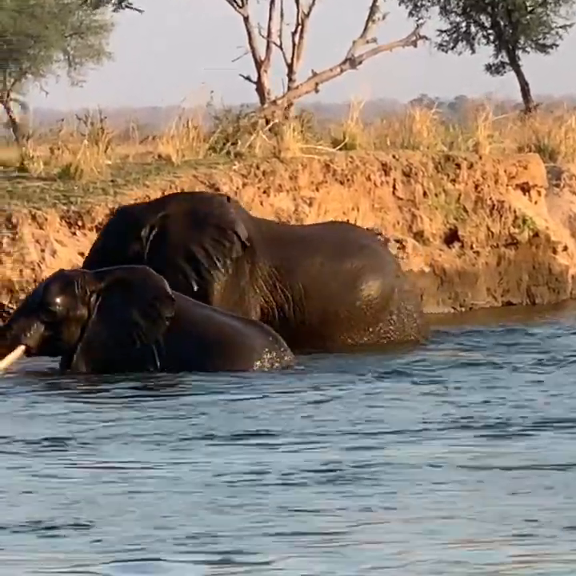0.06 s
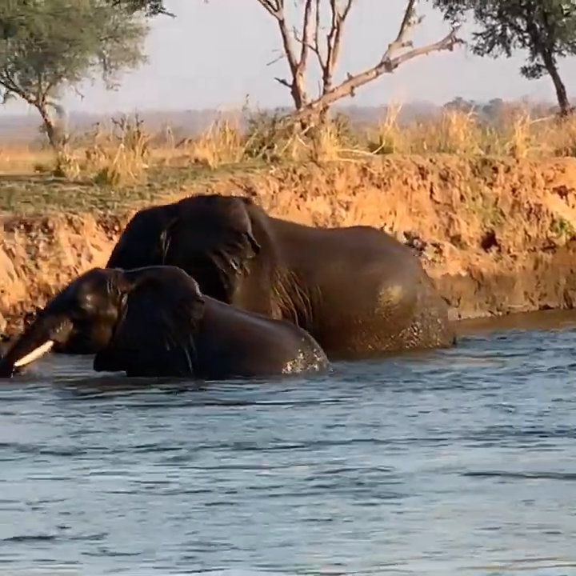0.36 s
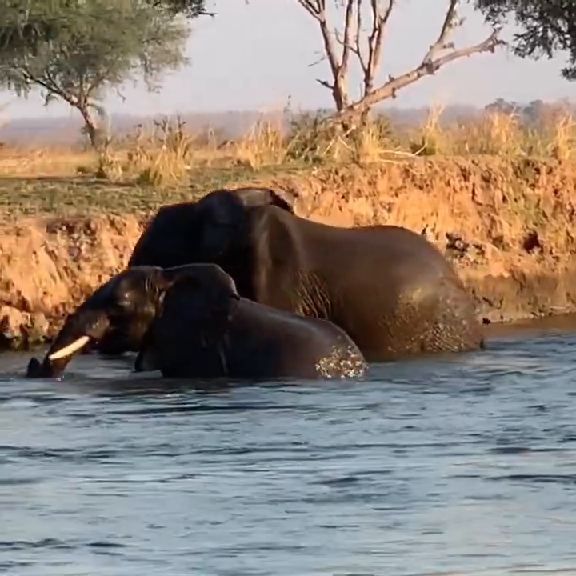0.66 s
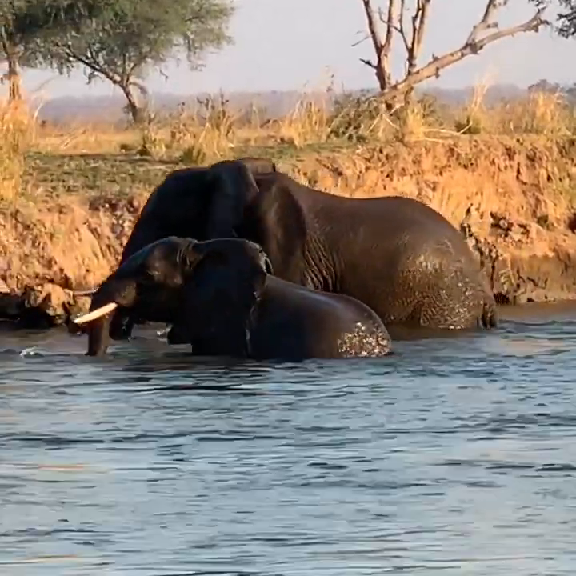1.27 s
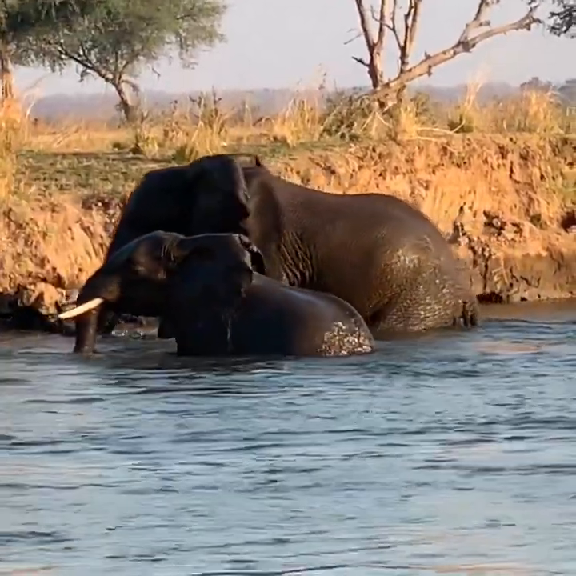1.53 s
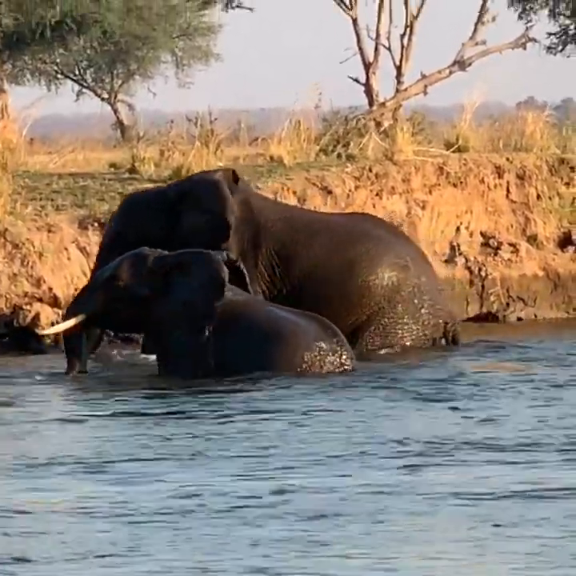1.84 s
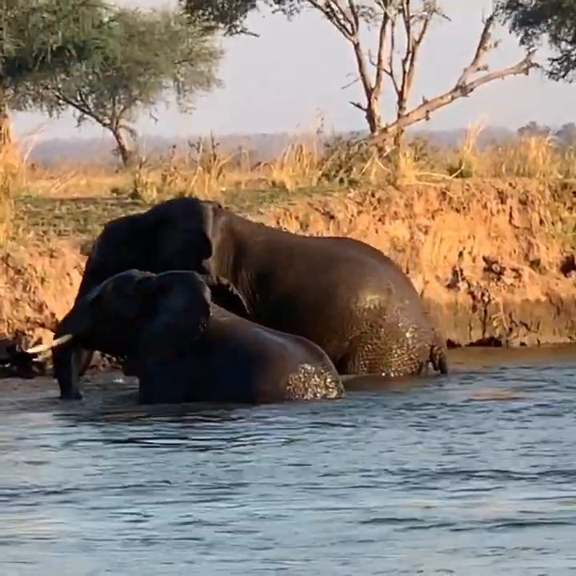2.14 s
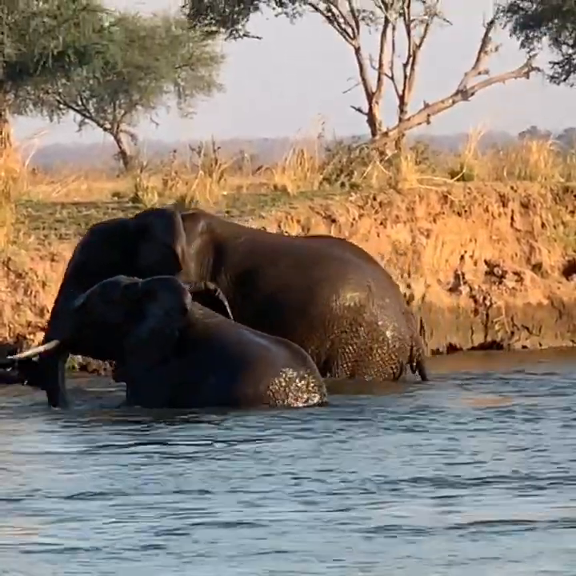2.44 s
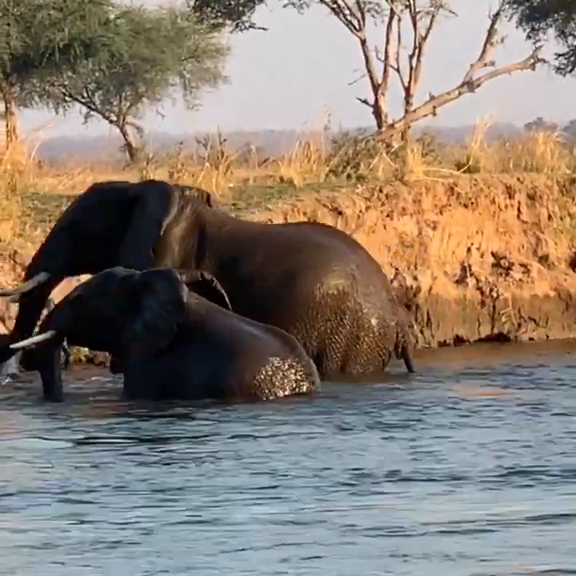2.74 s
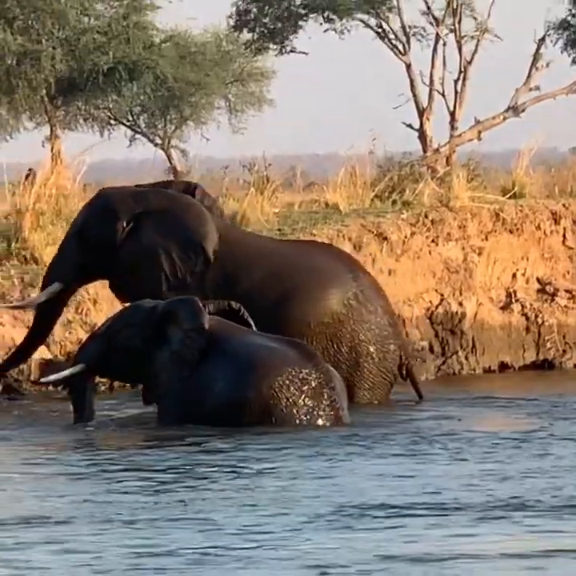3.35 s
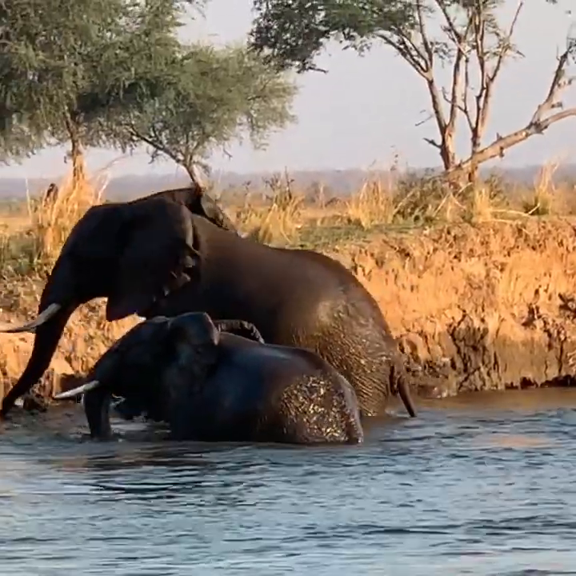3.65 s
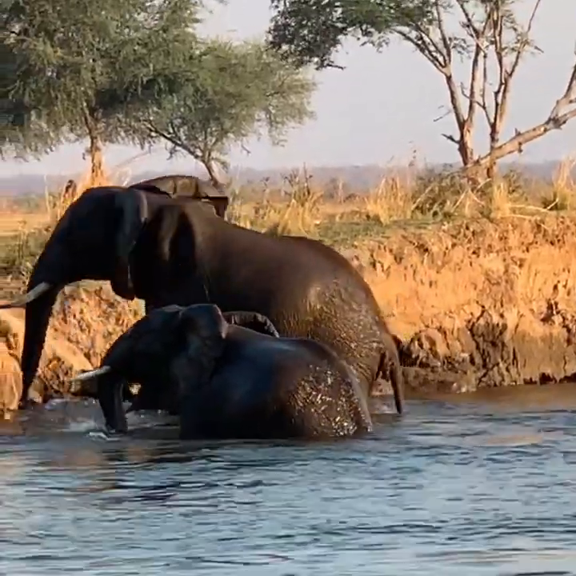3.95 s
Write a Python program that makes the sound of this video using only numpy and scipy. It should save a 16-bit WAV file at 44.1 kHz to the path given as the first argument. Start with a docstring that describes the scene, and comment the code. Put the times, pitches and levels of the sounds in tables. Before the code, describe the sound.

Deep, fluttering wind rumbles and thumps on the microphone beside a river, easing midway before picking up again. Behind it come the faint bubbling of the current and the soft sloshing and dripping of elephants wading.

```python
"""Wind over a river with wading elephants

Turbulent gusts buffet the microphone, drop for a second and come back. Under the rumble
the bubbles of the current hiss softly. Wading elephants slosh the water, with small
splashes, slaps, drips and a few hollow gurgles from resonating pockets of air."""
import sys
import numpy as np
from scipy import signal
from scipy.fft import rfft, irfft
from scipy.io import wavfile
from scipy.ndimage import uniform_filter1d

SR = 44100
rng = np.random.default_rng(int(sys.argv[2]) if len(sys.argv) > 2 else 0)


def put_to_file(sound):
    """Save the sound as 16-bit audio at rate SR, in the file named by the first command-line argument."""
    columns = np.atleast_2d(sound).T  # one column per channel
    safe = np.clip(columns, -1, 1)
    whole_steps = np.round(safe * 32767)
    wavfile.write(sys.argv[1], SR, whole_steps.astype(np.int16))


N = 176400
T = np.arange(N) / SR
FREQ_HZ = np.fft.rfftfreq(N, 1 / SR)


def amp(db):
    """Amplitude grows tenfold for every 20 dB."""
    return 10 ** (np.asarray(db) / 20)


def unit(x):
    """Normalisation to an rms of 1."""
    return x / np.sqrt(np.mean(x ** 2) + 1e-20)


def curve(points, hz):
    """Interpolation on a logarithmic frequency axis."""
    knot_hz, value = np.transpose(points)
    return np.interp(np.log(hz + 1), np.log(knot_hz + 1), value)


def wander(rate_hz):
    """Low-pass filtered noise: a smooth random fluctuation of rms 1."""
    return unit(irfft(rfft(rng.standard_normal(N)) * np.exp(-(FREQ_HZ / rate_hz) ** 2), N))


def swell(crest_s, rise_s, decay_s):
    """A transient envelope: Gaussian rise, then exponential decay."""
    age = T - crest_s
    return np.exp(-(np.minimum(age, 0) / rise_s) ** 2 - np.maximum(age, 0) / decay_s)


def stereo(a, b, coherence):
    """Sum and difference of independent signals give partly coherent channels."""
    mid, side = a * np.sqrt((1 + coherence) / 2), b * np.sqrt((1 - coherence) / 2)
    return np.array([mid + side, mid - side])


def turbulence(spectrum, coherence, steadiness):
    """Turbulent pressure is coloured noise; dividing by a power of its envelope steadies it."""
    a, b = rfft(rng.standard_normal((2, N))) * amp(curve(spectrum, FREQ_HZ))
    pressure = irfft(stereo(a, b, coherence), N)
    power = uniform_filter1d((abs(signal.hilbert(pressure)) ** 2).mean(0), size=1800)
    return unit(pressure / power ** (steadiness / 2))


# Gust strength: time_s, rumble_db, flutter_db
GUSTS = [(0, -34, -33.5), (.05, -34, -56), (.16, -37, -58.5), (0.238, -32, -47.5), (.32, -25.5, -53),
         (.4, -44, -57.5), (0.469, -33, -55), (0.538, -23.5, -38.5), (0.618, -30, -46.5), (.69, -22.5, -35),
         (0.772, -26, -46), (.9, -28, -51), (0.959, -26, -34.5), (1.071, -23, -45), (1.182, -28.5, -44.5),
         (1.265, -41, -64), (1.305, -17.5, -38), (1.375, -43.5, -56.5), (1.416, -22, -36.5),
         (1.455, -24.5, -41), (1.518, -32, -46), (1.589, -28, -38.5), (1.679, -39, -55),
         (1.759, -21.5, -35.5), (1.818, -38.5, -60), (1.95, -33, -52.5), (2.06, -44, -60.5),
         (2.26, -46, -78), (2.65, -46, -64), (2.972, -54, -88), (3.021, -27.5, -46), (3.08, -35, -63.5),
         (3.14, -34, -45.5), (3.2, -40.5, -64), (3.26, -28.5, -48), (3.39, -44, -84), (3.5, -37.5, -61.5),
         (3.591, -27.5, -42), (3.65, -39.5, -59), (3.76, -29.5, -62), (3.91, -37, -41.5), (3.95, -42, -55),
         (4, -26, -44)]
# Spectra of the wind's two bands: frequency_hz, relative_db
RUMBLE_SPECTRUM = [(10, -36.5), (28, -1), (55, 1.5), (80, -1), (105, -6), (135, -9), (200, -19),
                   (300, -44.5), (600, -85.5), (11000, -105)]
FLUTTER_SPECTRUM = [(60, -24), (130, -30), (190, 6.5), (270, 4), (380, -8), (520, -18.5), (750, -20.5),
                    (1200, -47), (2500, -56.5), (6000, -74), (11000, -89.5)]

def wind():
    """Turbulence at the microphone makes a deep rumble and a quick flutter above it."""
    time_s, rumble_db, flutter_db = np.transpose(GUSTS)
    rumble = turbulence(RUMBLE_SPECTRUM, coherence=0.85, steadiness=0.48)
    rumble *= amp(np.interp(T, time_s, rumble_db) + 2.62 * wander(rate_hz=36))
    flutter = turbulence(FLUTTER_SPECTRUM, coherence=0.97, steadiness=0.78)
    flutter = unit(flutter * amp(4.73 * wander(rate_hz=52)))
    return rumble + flutter * amp(np.interp(T, time_s, flutter_db))


# Left-right likeness of water noise: frequency_hz, coherence
WATER_COHERENCE = [(100, 0.93), (600, .72), (1200, 0.75), (1700, 0.38), (2900, 0.85), (3600, 0.099),
                   (5200, 0.32), (7000, 0.76), (9000, 0.27)]

def bubble_noise(spectrum, patch_db, flicker_db):
    """Many bubbles sum to noise whose level varies in patches of time and frequency."""
    hz = np.fft.rfftfreq(512, 1 / SR)
    a, b, c, d, patches = rng.standard_normal((5, N // 128 + 5, len(hz)))
    kernel = np.outer(signal.get_window("hann", 20), signal.get_window("hann", 10))  # frames by bins
    patches = unit(signal.fftconvolve(patches, kernel, "same"))
    flicker = uniform_filter1d(rng.standard_normal(a.shape), size=2, axis=0)
    flicker = unit(uniform_filter1d(flicker, size=30, axis=1))  # brief and broadband
    level_db = curve(spectrum, hz) + patch_db * patches + flicker_db * flicker
    frames = stereo(a + 1j * b, c + 1j * d, curve(WATER_COHERENCE, hz)) * amp(level_db)
    _, noise = signal.istft(frames.transpose(0, 2, 1), nperseg=512, noverlap=384)
    return unit(noise[:, :N])


# Spectrum of the current: frequency_hz, relative_db
RIVER_SPECTRUM = [(60, -18), (250, 0.5), (480, -2.5), (720, 1), (950, -3.5), (1200, -0.5), (1550, -6.5),
                  (2000, -3.5), (2800, -10.5), (4000, -13.5), (5600, -26), (7200, -23.5), (8500, -27),
                  (10500, -63)]

def river(level_db=-61):
    """Amplitude modulation gives the current's bubble noise slight swells and a trickling grain."""
    envelope = amp(level_db + wander(rate_hz=9.1))
    grain = unit(amp(1.2 * wander(rate_hz=98)))
    return envelope * grain * bubble_noise(RIVER_SPECTRUM, patch_db=2.5, flicker_db=1.5)


# Eddies striking the microphone: crest_s, peak_db, half_width_ms, rasp_db
EDDIES = [(0.023, -17, 1.6, -36.5), (0.235, -18.5, 4.7, -65), (0.538, -26, 7, -50),
          (0.656, -17.5, 2.8, -43), (0.67, -16.5, 1.6, -44), (.693, -20, 1.3, -32.5),
          (0.728, -21, 1.56, -36), (0.841, -19, 1.12, -30), (0.945, -18.5, 1.53, -43.5),
          (0.972, -14.5, 3, -47.5), (1.318, -18.5, 9.5, -66), (1.411, -16, 0.91, -31.5),
          (1.421, -7, 2.47, -37.5), (1.451, -19, 1.86, -39.5), (1.478, -29.5, 0.98, -44),
          (1.76, -13, 3.28, -38), (3.136, -16, 3.8, -59), (3.576, -20, 1.58, -46), (3.754, -17.5, 3.5, -74),
          (3.844, -25, 1.18, -53), (3.895, -29.5, 0.88, -43.5), (3.911, -26.5, 1.36, -38.5)]
# Spectrum of an eddy breaking up: frequency_hz, relative_db
RASP_SPECTRUM = [(100, -10), (250, 2), (380, 2), (550, -9), (750, -17), (1000, -36), (2500, -46),
                 (6000, -59), (11000, -86)]

def buffets():
    """A passing eddy is a pressure pulse between two dips; it breaks up in a turbulent rasp."""
    pulses, rasp_envelope = np.zeros((2, N))
    for crest_s, peak_db, half_width_ms, rasp_db in EDDIES:
        u = (T - crest_s) / (half_width_ms / 1000)
        pulses += amp(peak_db) * (1 - u ** 2) * np.exp(-u ** 2 / 2)
        rasp_envelope += amp(rasp_db) * swell(crest_s, rise_s=0.004, decay_s=0.0054)
    return pulses + rasp_envelope * turbulence(RASP_SPECTRUM, coherence=0.97, steadiness=0.89)


# Sloshes of wading: crest_s, rise_s, decay_s, body_db, spray_db
SPLASHES = [(0.039, 0.026, 0.036, -57, -68), (.115, 0.014, 0.03, -57, -67), (.21, 0.027, 0.024, -53, -69),
            (.45, 0.021, 0.029, -56, -61), (.505, 0.017, 0.037, -64.5, -60), (.64, 0.03, 0.056, -58, -61.5),
            (.85, 0.033, 0.083, -71, -71.5), (0.901, 0.0056, 0.011, -61, -69.5),
            (1.179, 0.018, 0.04, -57, -66.5), (1.49, 0.024, 0.065, -76.5, -68.5),
            (1.635, 0.02, 0.048, -64, -68), (1.8, 0.017, 0.059, -60, -65), (2.03, 0.04, 0.33, -61, -79),
            (2.24, 0.014, 0.032, -57, -71), (2.312, 0.011, 0.02, -48, -70),
            (2.342, 0.015, 0.019, -56.5, -51.5), (2.46, 0.061, 0.12, -60.5, -80),
            (2.795, 0.026, 0.016, -59.5, -64), (3.139, 0.052, 0.06, -52, -66.5),
            (3.37, 0.022, 0.036, -68, -71.5), (3.555, 0.046, 0.025, -59, -70),
            (3.787, 0.03, 0.05, -54, -64.5), (3.886, 0.025, 0.08, -59.5, -66),
            (3.985, 0.024, 0.045, -59, -65.5)]
# Spectra of a splash's two parts: frequency_hz, relative_db
BODY_SPECTRUM = [(200, 0.5), (500, -1.5), (900, -2.5), (1200, 1.5), (1550, -6), (2000, -3), (2700, -9.5),
                 (4500, -26.5), (11000, -62)]
SPRAY_SPECTRUM = [(1000, -7.5), (2500, 5), (3800, 8), (6000, 7.5), (8400, -0.5), (9300, -13),
                  (10200, -28.5), (11500, -31)]

def splashes():
    """Displaced water radiates a burst of bubble noise: a dull body and a bright, crackling spray."""
    body_envelope = sum(amp(db) * swell(*timing) for *timing, db, _ in SPLASHES)
    spray_envelope = sum(amp(db) * swell(*timing) for *timing, _, db in SPLASHES)
    crackle = unit(amp(2.3 * wander(rate_hz=430)))
    body = bubble_noise(BODY_SPECTRUM, patch_db=4, flicker_db=2.5)
    spray = bubble_noise(SPRAY_SPECTRUM, patch_db=2, flicker_db=0)
    return body_envelope * body + spray_envelope * crackle * spray


# Impacts of falling water: crest_s, level_db, decay_s
SLAPS = [(0.035, -60.5, 0.0028), (0.088, -57, 0.0033), (0.103, -59, .004), (0.447, -63, 0.0021),
         (1.791, -57.5, 0.0035), (1.817, -66, 0.0034), (2.325, -54, 0.014), (3.8717, -48.5, 0.0033)]
# Spectrum of an impact: frequency_hz, relative_db
SLAP_SPECTRUM = [(1000, -13), (2500, -10.5), (4000, 1), (7000, -2), (9000, -6.5), (10200, -23.5),
                 (12000, -23)]

def slaps(rise_s=0.00046):
    """A brief impact has a broad spectrum: water hits the surface with a bright crack."""
    envelope = sum(amp(db) * swell(crest_s, rise_s, decay_s) for crest_s, db, decay_s in SLAPS)
    return envelope * bubble_noise(SLAP_SPECTRUM, patch_db=0.5, flicker_db=4.1)


def add_drop(mix, start_s, peak, pitch_hz, bubbles=8, rise_s=0.00017, decay_s=0.003):
    """A drop traps a cluster of bubbles, each a damped oscillator ringing near one pitch."""
    bubble_hz = pitch_hz * np.exp(0.23 * rng.uniform(-1, 1, (bubbles, 1)))
    birth_s = rng.uniform(0, 0.0027, (bubbles, 1))
    port_delay_s = rng.uniform(0, 0.00005, (2, bubbles, 1))  # gives each bubble a direction
    age = np.maximum(np.arange(1024) / SR - birth_s - port_delay_s, 0)
    envelope = (1 - np.exp(-age / rise_s)) * np.exp(-age / decay_s)
    ring = (envelope * np.sin(2 * np.pi * bubble_hz * age)).sum(1)
    span = mix[:, round(start_s * SR):][:, :ring.shape[1]]
    span += peak * ring[:, :span.shape[1]] / abs(ring).max()


# Distinct drops: start_s, pitch_hz, peak_db
DRIPS = [(.202, 1190, -44.5), (.923, 1170, -44.5), (1.44, 6700, -56.5), (1.673, 6560, -55.5),
         (2.266, 5350, -47.5), (2.823, 3950, -47), (3.552, 3540, -48), (3.659, 2140, -45),
         (3.778, 1850, -42.5), (3.798, 1200, -48)]

def drips(patter_db=-79.5, patter_per_s=140):
    """Bubble resonance gives drops their pitch: a few ring clearly over a faint random patter."""
    clear, patter = np.zeros((2, 2, N))
    for start_s, pitch_hz, peak_db in DRIPS:
        add_drop(clear, start_s, amp(peak_db), pitch_hz)
    for when, pitch, faintness in rng.random((int(patter_per_s * N / SR), 3)):
        peak = amp(-4 * np.log(faintness + 0.013))  # many weak drops, few strong
        add_drop(patter, when * N / SR, peak, pitch_hz=1500 * 4.6 ** pitch)
    return clear + amp(patter_db) * unit(patter)


# Ringing air pockets: crest_s, half_length_s, pitch_hz, level_db
GURGLES = [(3.498, 0.015, 734, -55), (3.544, 0.07, 679, -62.5), (3.693, .03, 651, -56.5),
           (3.972, 0.0096, 711, -49)]

def gurgles(bandwidth_hz=75, glide_hz_per_s=900):
    """A resonating air pocket sounds a narrow band of noise that rises slightly in pitch."""
    out = np.zeros(N)
    for crest_s, half_length_s, pitch_hz, level_db in GURGLES:
        age = T - crest_s
        cycles = pitch_hz * age + glide_hz_per_s * age ** 2 / 2
        fuzz = wander(bandwidth_hz) + 1j * wander(bandwidth_hz)
        fuzz /= np.sqrt(abs(fuzz))  # evens out the swells
        note = unit((fuzz * np.exp(2j * np.pi * cycles)).real)
        out += amp(level_db) * np.exp(-(age / half_length_s) ** 2 / 2) * note
    return out


# Phase of the water's sound between the microphone ports: frequency_hz, left_lead_rad
PORT_PHASE = [(1200, 0.11), (1900, 0.64), (2300, 1.9), (3000, 2), (5900, 2.2), (7000, .6)]

def at_ports(sound):
    """A wave reaches two spaced ports with a phase difference that depends on frequency."""
    phase_rad = np.outer([0.5, -0.5], curve(PORT_PHASE, FREQ_HZ))
    return irfft(rfft(sound) * np.exp(1j * phase_rad), N)


def scene():
    """Superposition: wind pressure at the microphone adds to the sound of the water."""
    return wind() + buffets() + at_ports(river() + splashes() + slaps() + gurgles() + drips())


def record(dry, cutoff_hz=11800):
    """Band limiting: a linear-phase low-pass filter removes the highest treble."""
    lowpass = signal.firwin(511, cutoff_hz, window=("kaiser", 9), fs=SR)
    return signal.oaconvolve(dry, lowpass[None], "same")


dry = scene()
out = record(dry)
put_to_file(out)
```